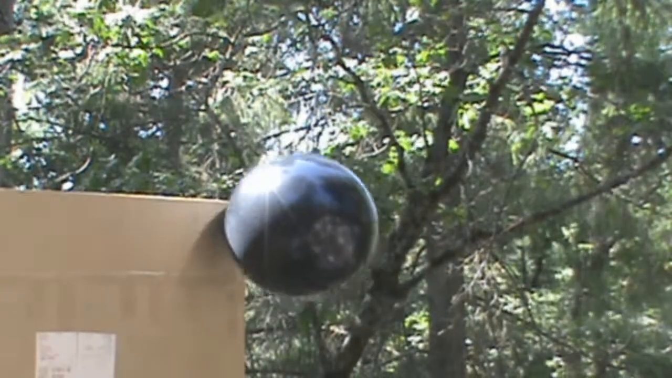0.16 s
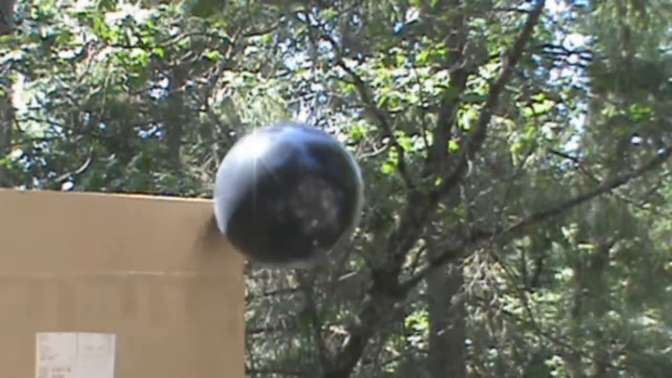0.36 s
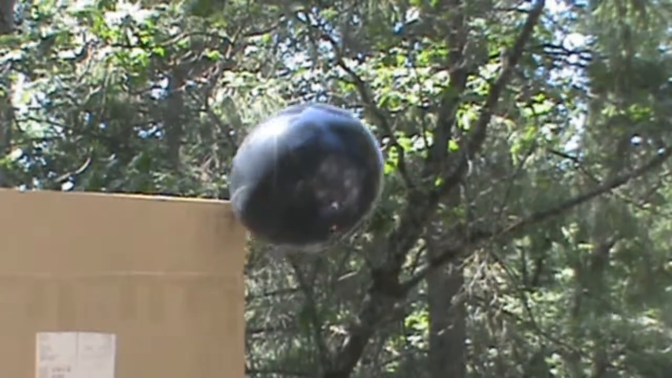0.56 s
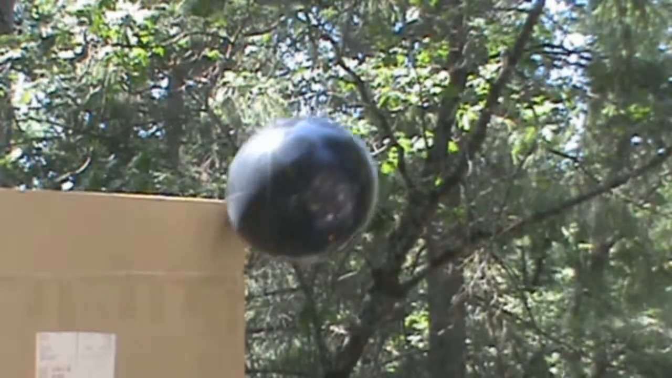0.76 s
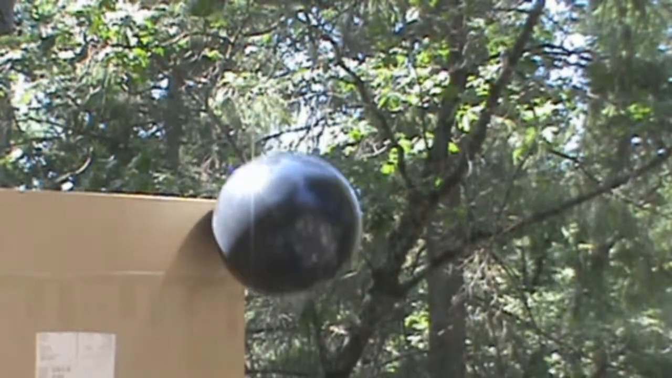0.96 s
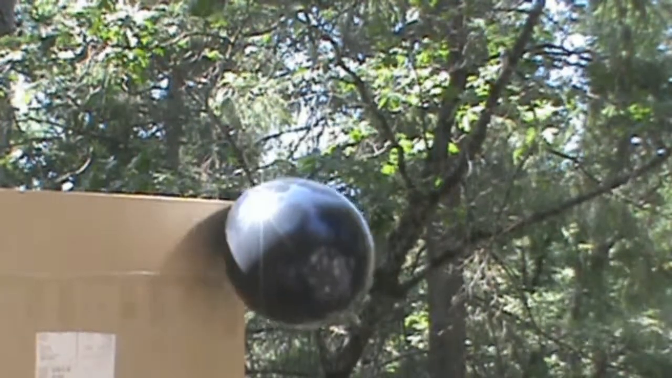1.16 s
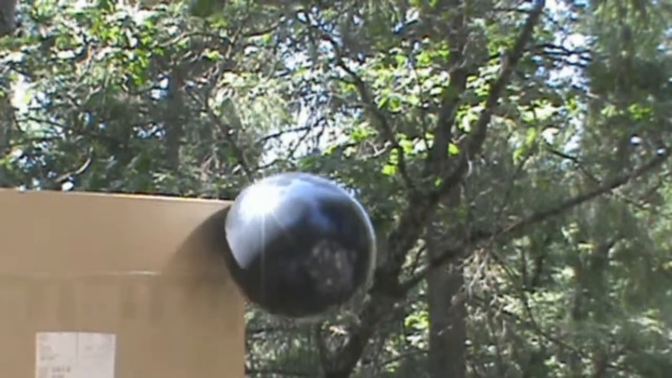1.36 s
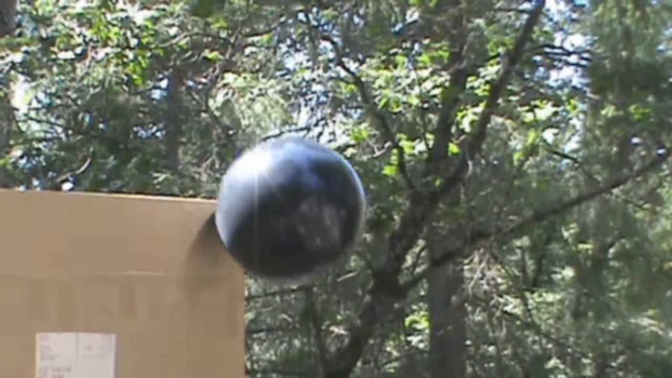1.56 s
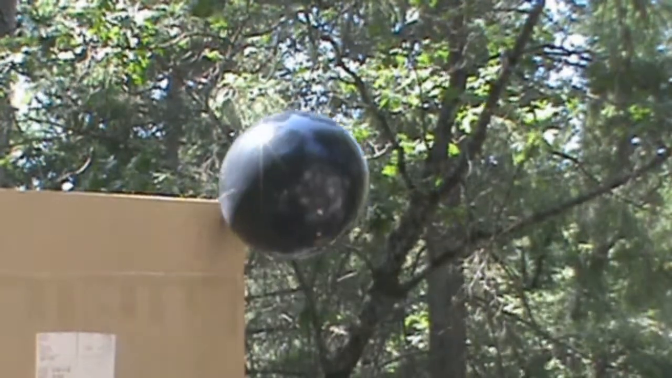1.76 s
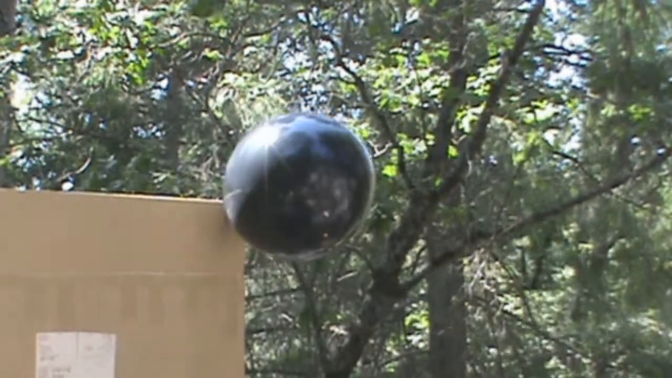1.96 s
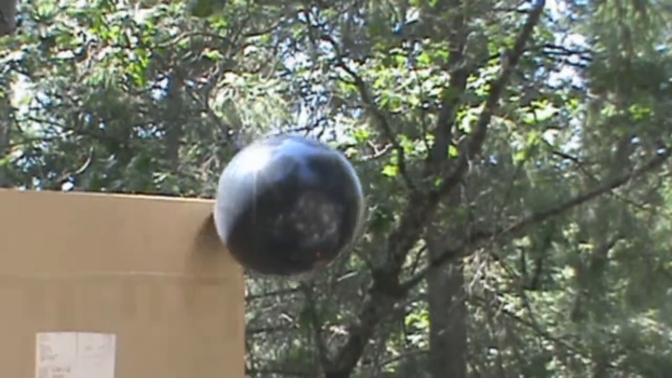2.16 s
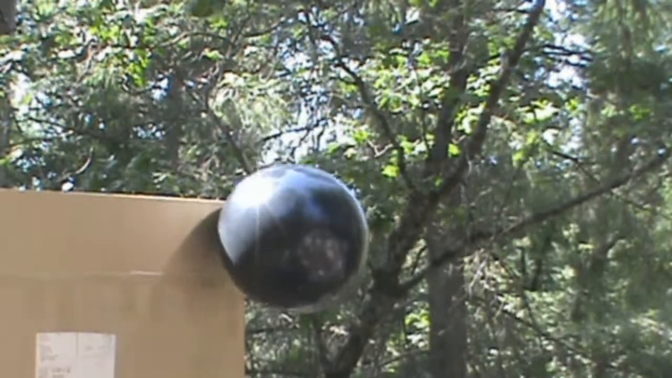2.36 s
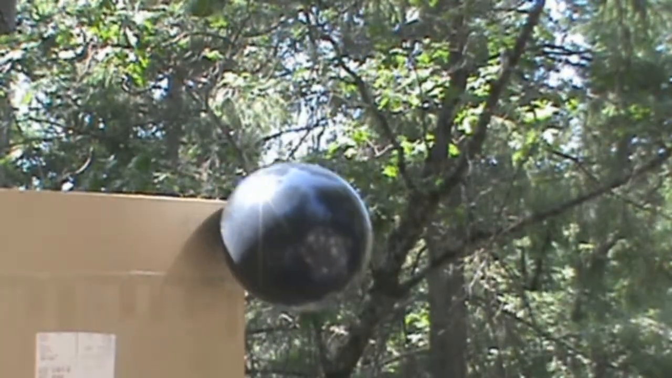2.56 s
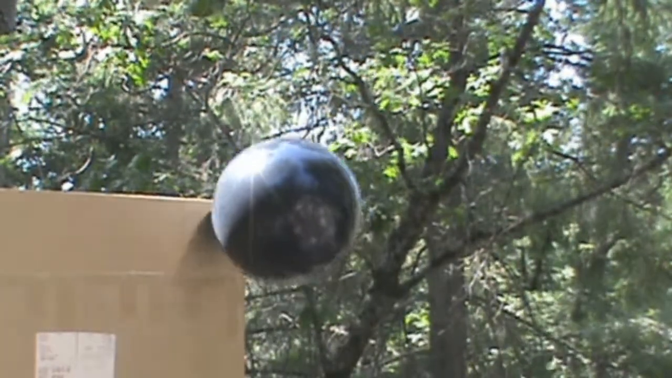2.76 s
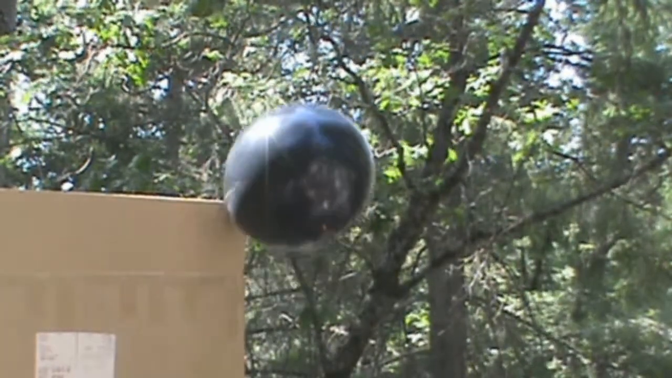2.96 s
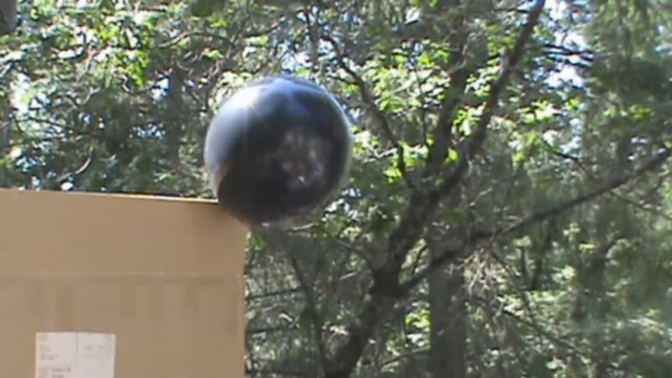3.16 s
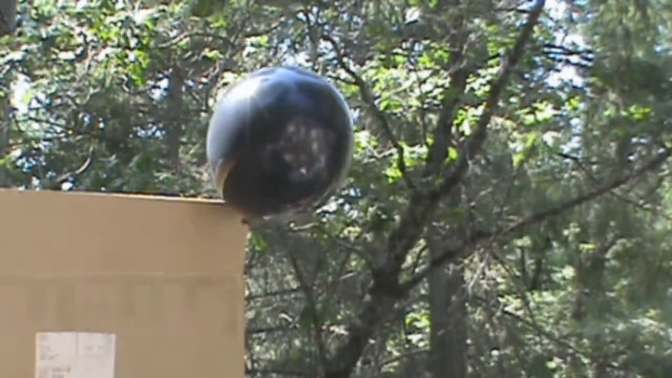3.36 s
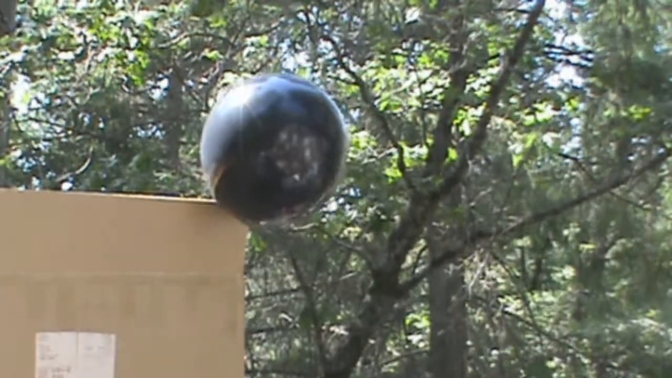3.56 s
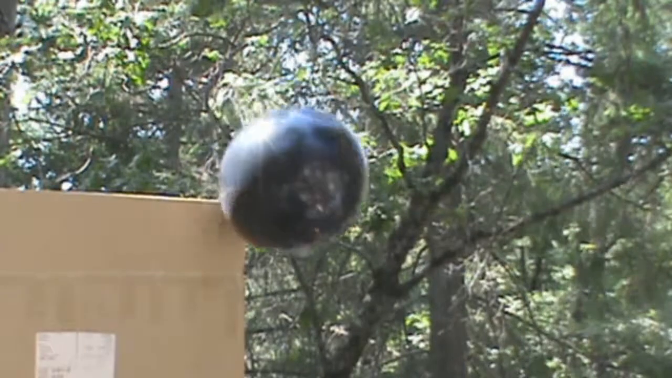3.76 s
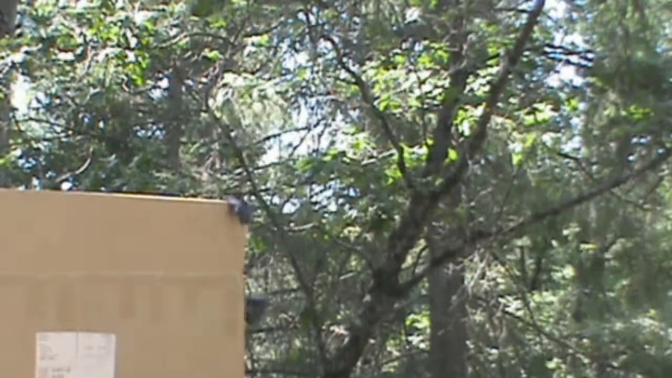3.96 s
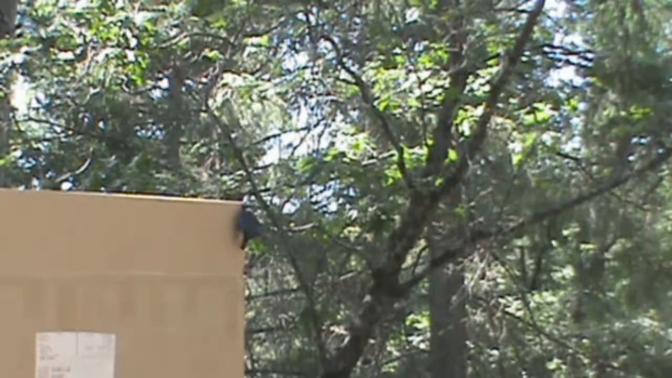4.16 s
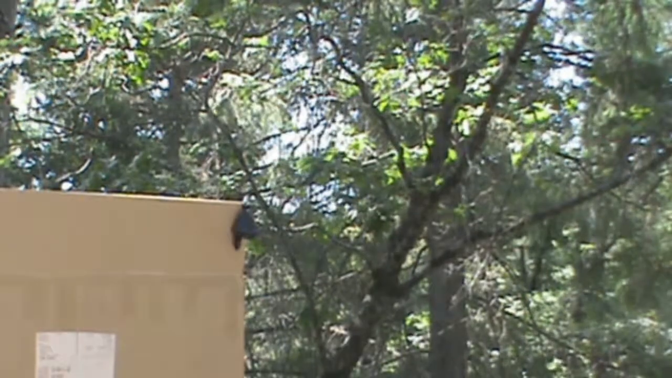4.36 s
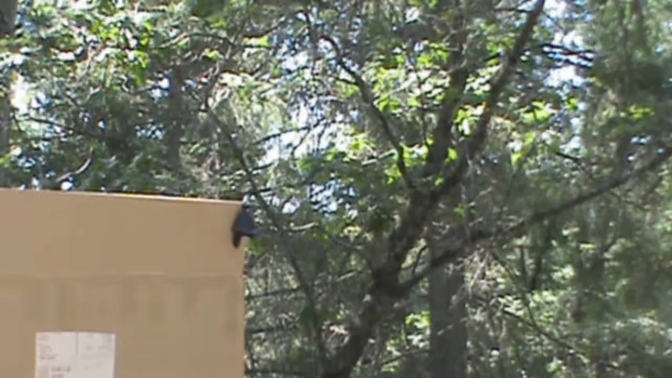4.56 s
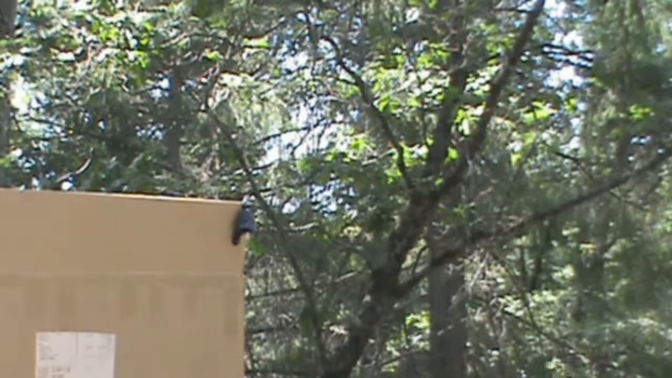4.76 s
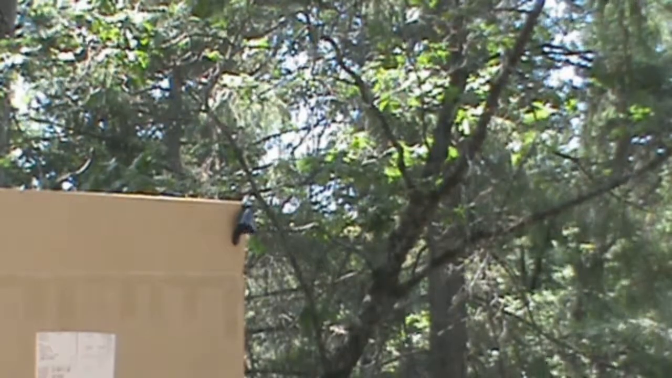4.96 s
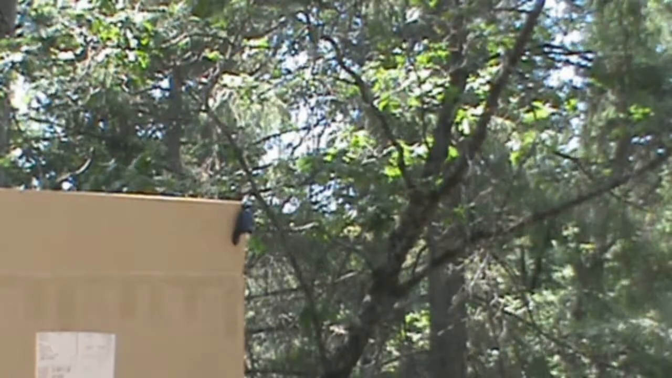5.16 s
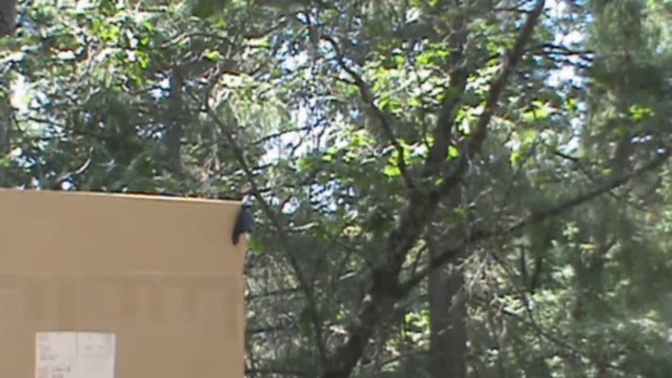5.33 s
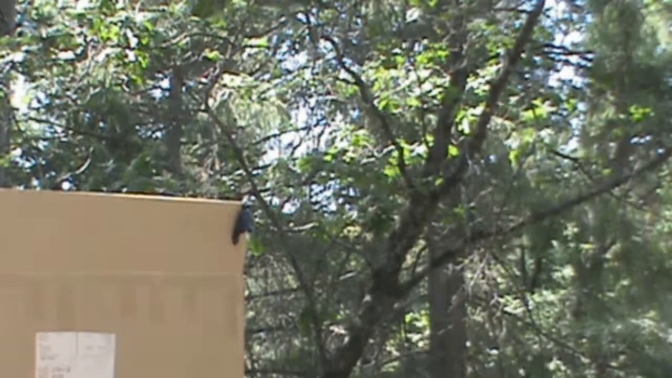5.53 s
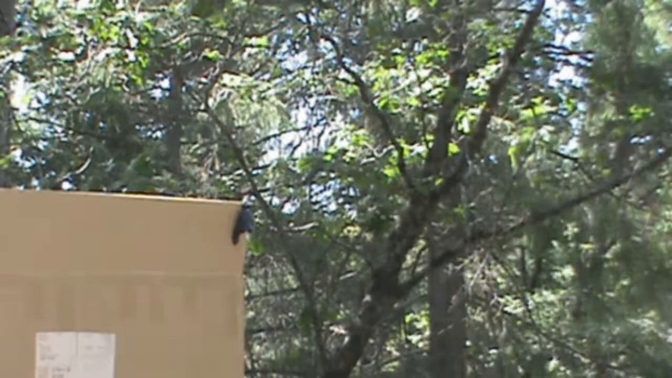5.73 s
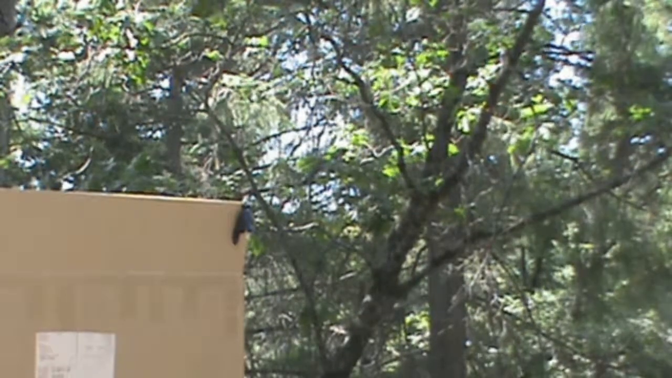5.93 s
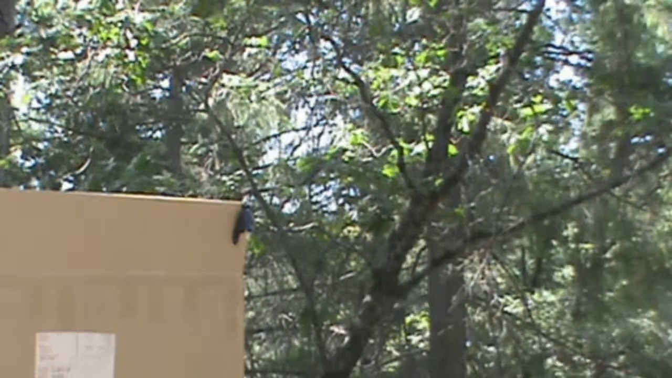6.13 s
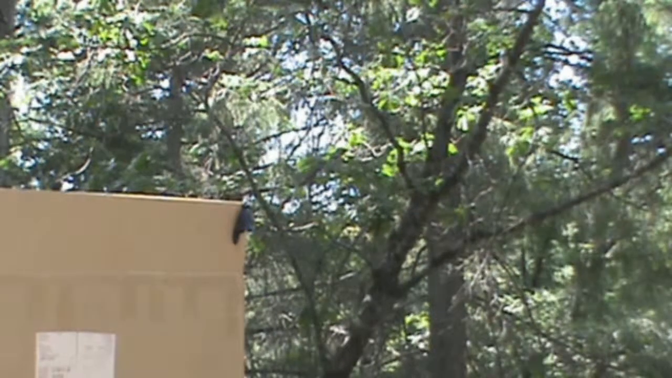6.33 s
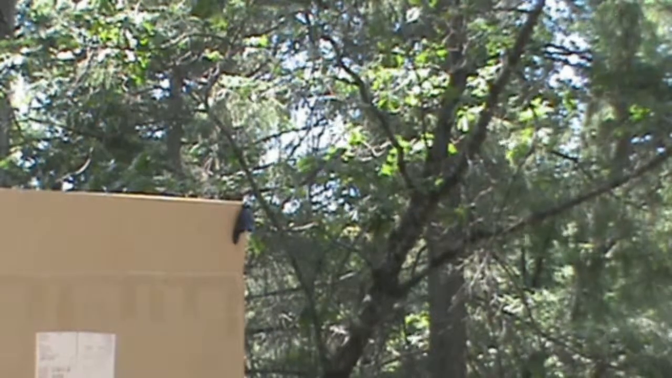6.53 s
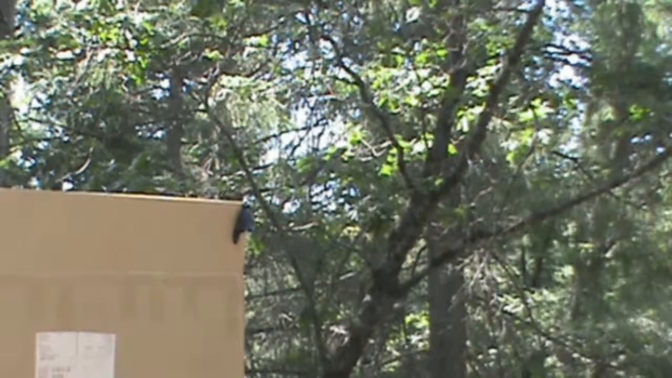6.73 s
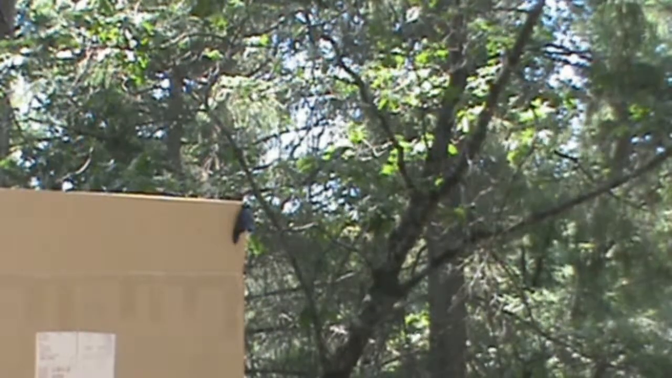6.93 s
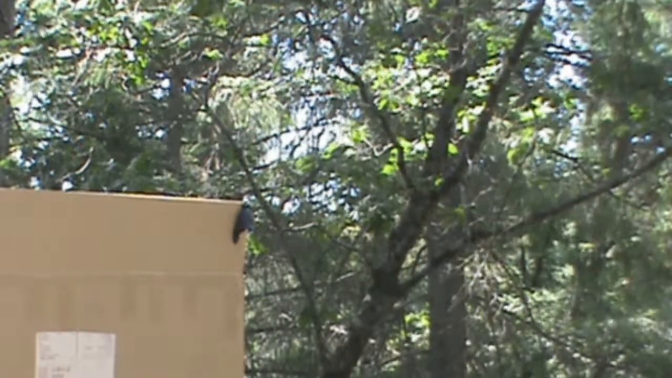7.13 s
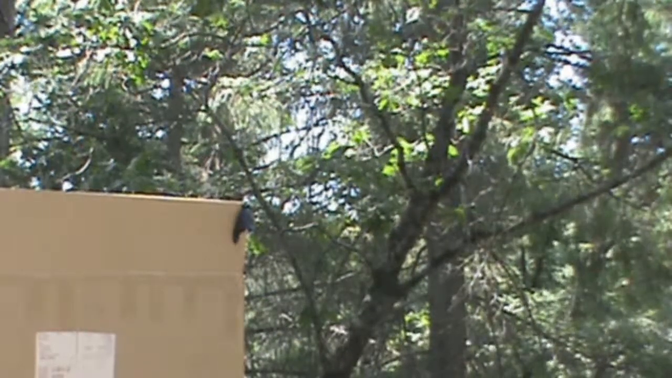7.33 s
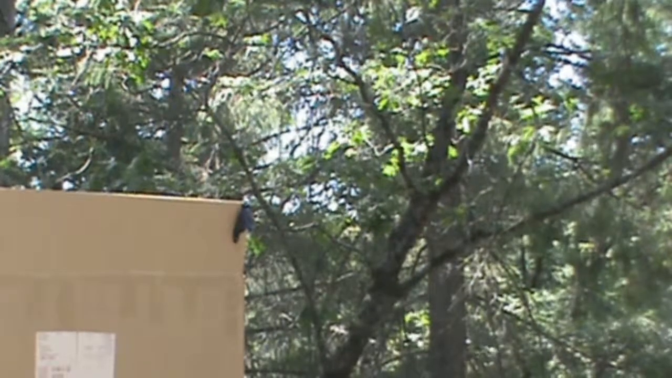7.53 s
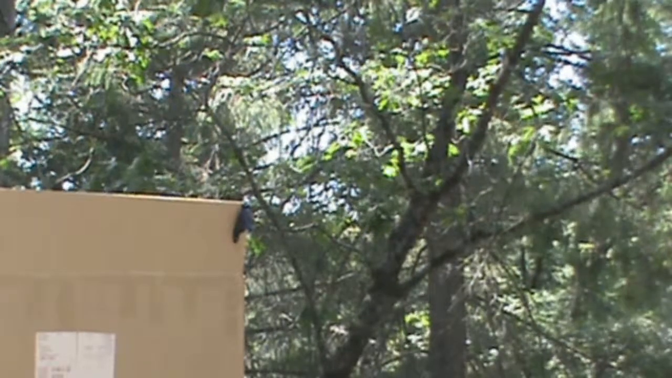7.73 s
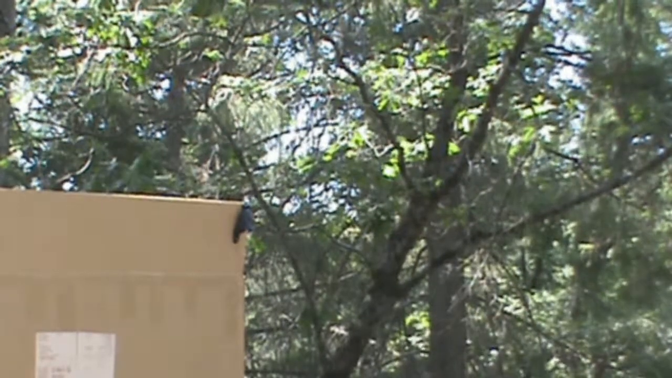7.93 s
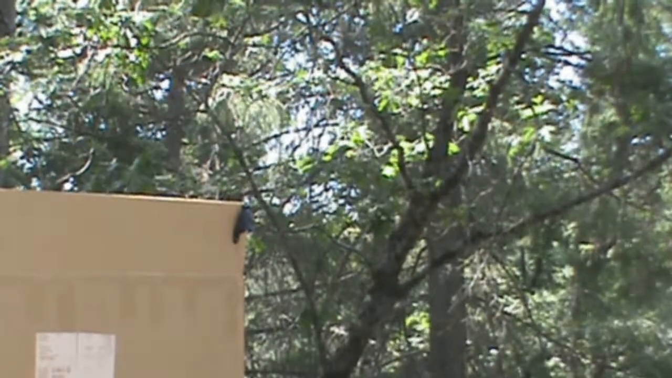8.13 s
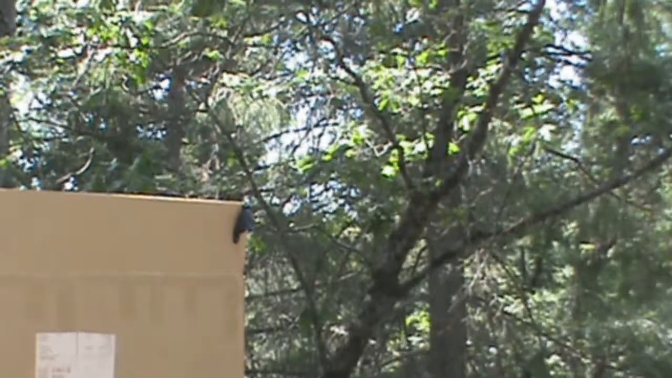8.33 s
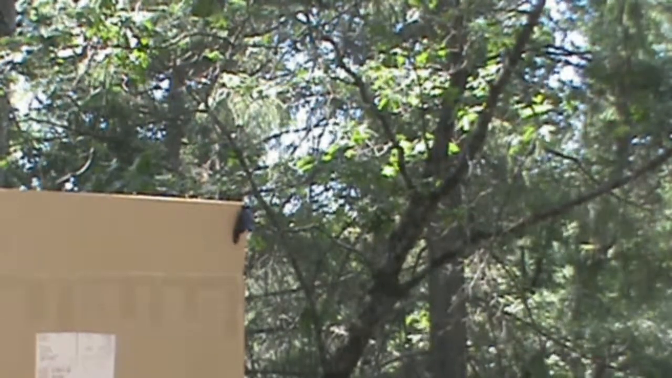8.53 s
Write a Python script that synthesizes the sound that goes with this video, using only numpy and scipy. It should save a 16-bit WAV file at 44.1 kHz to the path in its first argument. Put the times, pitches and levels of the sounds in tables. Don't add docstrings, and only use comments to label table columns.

```python
import sys
import numpy as np
from scipy import signal
from scipy.fft import rfft, irfft, next_fast_len
from scipy.io import wavfile
from scipy.ndimage import uniform_filter1d, map_coordinates

SR = 44100
rng = np.random.default_rng(int(sys.argv[2]) if len(sys.argv) > 2 else 0)


def unload_audio(sound):
    columns = np.transpose(np.atleast_2d(sound))
    steps = np.round(np.clip(columns, -1, 1) * 32767)
    wavfile.write(sys.argv[1], SR, steps.astype(np.int16))


def decibels_to_gain(level_db):
    exponent = np.asarray(level_db, float) / 20
    return 10 ** exponent


N = 378995
T = np.arange(N) / SR


def rms1(x):
    return x / np.sqrt(np.mean(x ** 2))


def colour(x, table):
    hz, db = np.transpose(table)[:2]
    size = next_fast_len(x.shape[-1])
    f = np.log(np.arange(size // 2 + 1) * SR / size + 1)
    gain = decibels_to_gain(np.interp(f, np.log(hz), db))
    return irfft(rfft(x, size) * gain, size)[..., :x.shape[-1]]


def band(x, lo_hz, hi_hz, order=3):
    sos = signal.butter(order, [lo_hz, min(hi_hz, 20000)], "band", fs=SR, output="sos")
    return signal.sosfilt(sos, x)


def high(x, hz):
    return signal.sosfilt(signal.butter(2, hz, "high", fs=SR, output="sos"), x)


def hiss(count, like=.8):
    mid, side = rng.standard_normal((2, count))
    like = np.clip(like, 0, .99)
    return np.sqrt((1 + like) / 2) * mid + np.sqrt((1 - like) / 2) * side * np.array([[1], [-1]])


def flicker(count, rate, depth_db):
    k = int(SR / rate)
    held = np.repeat(rng.standard_normal(count // k + 1), k)
    return decibels_to_gain(depth_db * uniform_filter1d(held, k)[:count])


def fall(t, t60):
    return np.exp(-np.log(1000) * t / t60)


def ring(hz, t60):
    t = T[:int(min(t60, .6) * SR) + 8]
    return np.sin(2 * np.pi * hz * t) * fall(t, t60)


def swell(start, rise, hold, t60):
    rise, t60 = max(rise, .001), max(t60, .005)
    t = T[:min(int((rise + hold + t60) * SR), N - int(start * SR))]
    opening = np.sin(np.pi / 2 * np.clip(t / rise, 0, 1)) ** 2
    return t, opening * decibels_to_gain(-60 * np.clip(t - rise - hold, 0, None) / t60)


def add(out, s, x, pan_db=-4.0):
    i = int(s * SR)
    out[:, i:i + x.shape[-1]] += x * decibels_to_gain(np.array([[pan_db], [-pan_db]]) / 2)


def background():
    # frequency in Hz, level in dB per Hz.
    traffic = [(12, -37), (28, -2), (43, 0.5), (74, -10.5), (107, -0.5), (146, -7), (248, -4.5), (328, -4),
               (459, -1), (698, -2.5), (1330, -11), (2910, -22.5), (3160, -22), (8650, -24.5), (16000, -25)]
    # frequency in Hz, likeness of left and right 0-1.
    alike = [(60, 1), (130, 0.97), (290, 0.95), (640, 0.87), (1410, 0.35), (3100, 0.43), (6820, 0.34),
             (15000, 0.77)]
    # time in seconds, level in dB.
    breeze = [(0, 3.5), (.6, 9.5), (.9, 0.5), (2, 1), (3.3, -0.5), (3.9, 2.5), (4.6, -0.5), (5.3, 1),
              (6, 1), (7.1, 0), (7.5, 3.5), (8.59, 3)]
    level_db, recover_db, recover_tau_s, shot_end_s = -55.5, -5, 0.61, 4.22
    hz, like = np.transpose(alike)
    like = np.clip(like, 0, .99)
    mid, side = colour(rng.standard_normal((2, N)), traffic)
    mid = colour(mid, np.c_[hz, 10 * np.log10(1 + like)])
    side = colour(side, np.c_[hz, 10 * np.log10(1 - like)])
    x = np.array([mid + side, mid - side]) / np.std(band(mid, 508, 980))
    x = x + (decibels_to_gain(np.interp(T, *np.transpose(breeze))) - 1) * band(x, 2197, 17000, order=1)
    dip_db = recover_db * (T > shot_end_s) * np.exp(-np.abs(T - shot_end_s) / recover_tau_s)
    return x * decibels_to_gain(level_db + dip_db) * flicker(N, rate=3.152, depth_db=0.7)


def whine(out):
    add(out, 0, decibels_to_gain(-77.0) * rms1(band(hiss(N, like=0.428), 3080, 3160, order=1)), pan_db=-9.0)
    add(out, 0, decibels_to_gain(-73.5) * rms1(band(hiss(N, like=1.0), 15500, 15700, order=1)), pan_db=-2.5)


def clicks(out):
    # start in seconds, peak in dB, ring in Hz, left minus right in dB.
    latch = [
        (0.096, -24, 3500, -9),
        (0.0971, -29, 2530, -3),
        (.101, -19.5, 3340, -8),
        (0.1064, -22, 3450, -4),
        (.118, -33, 4200, -3),
    ]
    bodies = [
        (0.2222, -28.5, 2590, -9),
        (5.499, -35.5, 1880, -2.5),
        (1.5087, -38, 1100, -5),
    ]
    fittings = [(0.223, -40, 6100, -7), (0.279, -33, 5000, -5), (.228, -30, 2800, -5),
                (.242, -33, 5200, -4), (0.789, -27, 4900, -9), (0.8, -31, 5140, 1), (1.294, -39, 7100, -11),
                (1.3004, -42, 7460, -2), (1.654, -24.5, 2720, -3), (3.7, -45, 1710, -1.1),
                (5.4844, -34, 6750, 3), (6.8678, -36, 5500, -7), (6.8716, -30, 5000, -5)]
    ticks = [
        (0.2518, -28, 13600, 0),
        (.252, -30, 14800, 0),
        (0.4174, -49, 9890, -0.6),
        (1.8703, -44, 8100, -7),
        (3.754, -43.5, 9970, 1.1),
        (7.4794, -46, 8140, -0.6),
    ]
    snaps = [
        (6.6814, -23, 5500, -11),
        (4.216, -10.5, 10000, -2),
        (3.941, -16, 4460, -1),
        (3.946, -7, 5500, -1),
        (3.9459, -16.5, 1500, -1),
        (4.0245, -11, 3200, 0.1),
        (4.0426, -10.5, 3220, 0),
        (4.082, -13, 5100, 1.5),
    ]
    faint = [(7.231, -48, 2920, -5), (7.2705, -37, 2800, -6), (7.6612, -35.5, 2240, -4.5),
             (7.7458, -40, 3600, -7), (7.8892, -43, 3500, -2.5), (8.0196, -33.5, 7800, -7),
             (8.0196, -34.5, 3900, -7), (8.219, -41, 3700, -5), (8.3639, -40, 6550, -5),
             (8.29, -48, 6000, -4), (1.65, -31, 3000, -3), (1.667, -30, 2400, -3), (1.74, -33, 3000, -3),
             (1.72, -30.5, 2200, -3), (1.805, -47, 5000, -5), (1.5682, -41, 3600, -3),
             (1.5078, -27.5, 2160, -5), (1.5078, -34, 5000, -3)]
    catch = [(6.871, -32, 3510, -6), (6.8712, -37, 4760, -4), (6.8712, -37, 6000, -7),
             (6.8712, -33, 7025, -4), (6.8712, -37, 9300, -4), (6.8965, -48, 3420, -4),
             (6.8965, -42, 8330, -4), (0.098, -35, 7150, -7), (.0975, -43, 8400, -7),
             (.0975, -44, 11500, -7), (.0975, -44, 4940, -7), (.1063, -34, 3445, -5)]
    # t60 in seconds, burst spread as pitch ratio, mode share 0-1.
    rings = [(0.01, 1.26, 0.78), (0.0065, 1.85, .6), (0.0093, 2.2, 0.74), (.01, 1.3, 0.74),
             (.003, 3.4, 0.72), (0.012, 2.2, 0.47), (0.046, 1.09, 0.66)]
    families = (latch, bodies, fittings, ticks, snaps, faint, catch)
    for rows, (t60, spread, mode) in zip(families, rings):
        spread = max(spread, 1.05)
        for s, db, hz, pan_db in rows:
            x = ring(hz, t60)
            lo, hi = hz / spread ** 1.03, min(hz * spread, 15500)
            burst = rms1(band(rng.standard_normal(500 + SR // 8), lo, hi, order=2))[500:500 + len(x)]
            burst = burst * fall(T[:len(x)], t60)
            snap = band(signal.unit_impulse(len(x)), lo, hi, order=2)
            click = mode * x + 0.44 * burst + .5 * snap / snap.max()
            add(out, s, decibels_to_gain(db) * click, np.clip(pan_db, -7, 2))


def rubs(out):
    # peak in seconds, rise in seconds, fall t60 in seconds, level in dB, centre in Hz.
    strokes = [(.104, 0.0063, 0.11, -47, 2700), (.797, 0.0072, 0.097, -47.5, 4700),
               (1.575, .008, .6, -46.5, 2700), (6.878, 0.0045, .1, -60, 3300),
               (.218, 0.029, .03, -54, 4960), (.228, .008, 0.15, -42.5, 2800),
               (.248, .025, 0.19, -43, 4300), (.33, .04, 0.32, -57, 4500), (1.028, .07, .5, -56, 3100),
               (1.106, 0.019, 0.25, -52, 2850), (1.652, .07, 0.43, -39.5, 2600),
               (1.7, .03, 0.2, -40.5, 3180), (1.68, .05, 0.4, -52, 7400), (1.745, .05, 0.088, -42, 2610),
               (3.702, 0.056, 0.51, -57, 1615), (5.5, .018, 0.24, -48.5, 3930),
               (6.873, 0.003, 0.1, -40, 4800), (6.875, 0.0043, .12, -56, 9000),
               (7.238, 0.027, 0.6, -55.5, 2800), (8.224, 0.019, 1, -55, 3200), (8.37, 0.11, .2, -64, 3500)]
    for s, rise, t60, db, hz in strokes:
        gate = swell(s - rise, rise, 0, t60)[1]
        tilt_db = 8 * np.log2(hz / 3000)
        low_db, top_db = -7 - tilt_db, -8.5 + tilt_db
        grit = hiss(len(gate), like=0.71)
        grit = grit * flicker(len(gate), rate=1500, depth_db=1.5) * flicker(len(gate), rate=150, depth_db=2.5)
        mix = rms1(band(grit, hz / 2.0, hz * 1.81, order=2))
        mix = mix + decibels_to_gain(low_db) * rms1(band(grit, 300, 830, order=2))
        mix = mix + decibels_to_gain(top_db) * rms1(band(grit, 4270, 9870, order=2))
        add(out, s - rise, mix * decibels_to_gain(db) * gate)


def thud(out, s, db, hz, t60):
    add(out, s, decibels_to_gain(db) * (0.94 * ring(hz, t60) + 0.18 * ring(1.4 * hz, t60)), pan_db=-1.5)


def knocks(out):
    # start in seconds, peak in dB, ring in Hz, t60 in seconds.
    hits = [
        (1.667, -33, 486, 0.033),
        (1.705, -33.5, 564, 0.032),
        (0.295, -33.5, 366, 0.03),
        (1.622, -31, 441, 0.079),
        (3.699, -36.5, 963, 0.043),
        (7.269, -41.5, 796, 0.043),
        (7.8726, -28.5, 450, 0.028),
        (7.873, -40, 160, .12),
        (7.884, -38, 228, 0.061),
    ]
    for s, db, hz, t60 in hits:
        thud(out, s, db, hz, t60)


def jets(out):
    # valve opens in seconds, rise in seconds, hold in seconds, top hiss in dB, fall t60 in seconds.
    openings = [
        (0.471, 0.044, .05, -21.5, 0.057),
        (0.546, 0.038, 0.048, -19.5, 0.16),
        (3.911, 0.011, 0.03, -22.5, .04),
        (3.94, .022, 0.254, -17, .03),
        (6.682, 0.006, 0.023, -21.5, 0.12),
    ]
    # middle hiss minus top in dB, barrel roar minus top in dB, pressure drift in dB/s.
    balance = [(-5, -20.5, 12), (-5.5, -18.5, -62), (-2, -17.5, -2), (-6, -22.5, -2), (-5, -13, 48)]
    # frequency in Hz, level in dB per Hz.
    fill_air = [(290, -44), (500, 4), (729, -15), (893, -15), (1130, -19), (1360, -16), (3920, -10),
                (4470, -8.5), (9770, 1.5), (14500, -3), (16000, 0)]
    shot_air = [(290, -55), (500, -7.5), (1090, -27.5), (1180, -24.5), (1690, -17.5), (2010, -21),
                (2890, -18.5), (6140, -9.5), (7300, -7), (8100, 0), (11200, -1), (12000, -1.5), (13400, -9),
                (14900, -11.5), (16000, -14)]
    vent_air = [(290, -40), (500, 9), (595, -2), (831, -11), (1180, -12.5), (1640, -15), (2500, -13),
                (2930, -11.5), (8700, -5), (9920, -0.5), (16000, -11.5)]
    # centre in Hz, width in Hz, level in dB.
    nozzle = [(940, 99, -17), (1510, 1100, -13.5), (3920, 630, -11), (5820, 1300, -6.5), (7770, 800, -9),
              (8440, 1000, -3), (11000, 1200, -13), (12600, 400, -8), (14500, 1100, -10)]
    # start in seconds, level in dB, start in Hz, end in Hz, length in seconds.
    sputter = [
        (3.913, -24, 2980, 6450, 0.0067),
        (3.919, -22, 3000, 6500, 0.0078),
        (3.92, -15, 6100, 10400, 0.003),
        (3.925, -13.5, 5900, 11000, .004),
        (3.932, -21, 6160, 11000, 0.0039),
    ]
    duck_s, duck_db, duck_width_s = 4.036, -4, 0.011
    airs = (None, fill_air, shot_air, shot_air, vent_air)
    for (s, rise, hold, db, t60), (mid_db, low_db, drift_db), air in zip(openings, balance, airs):
        t, gain = swell(s, rise, hold, t60)
        duck = duck_db * np.exp(-((s + t - duck_s) / duck_width_s) ** 2)
        gain = gain * decibels_to_gain(db + drift_db * np.clip(t - rise, 0, hold) + duck)
        x = hiss(len(t), like=0.61)
        if air is None:
            cavities = sum(decibels_to_gain(g) * rms1(band(x, f - w / 2, f + w / 2, order=2)) for f, w, g in nozzle)
            x = decibels_to_gain(7) * rms1(colour(x, fill_air)) + cavities
        else:
            x = colour(x, air)
        mix = rms1(band(x, 6370, 16500))
        mix = mix + decibels_to_gain(mid_db) * rms1(band(x, 2640, 7080))
        mix = mix + decibels_to_gain(low_db) * rms1(band(x, 884, 2840))
        mix[0] += 0.45 * band(mix[0], 11000, 17000, order=1)
        rough = flicker(len(t), rate=210, depth_db=0.84) * flicker(len(t), rate=45, depth_db=0.5)
        add(out, s, mix * gain * rough)
    for s, db, f0, f1, length in sputter:
        t = T[:int(length * SR)]
        add(out, s, decibels_to_gain(db) * np.hanning(len(t)) * signal.chirp(t, f0, length, f1))


def buffet(out):
    # peak in seconds, rise in seconds, fall t60 in seconds, level in dB.
    gusts = [
        (.585, 0.027, 0.47, -48),
        (.652, 0.066, .07, -45),
        (1.1, 0.054, .08, -59),
        (1.64, 0.048, 0.45, -50),
        (1.738, 0.087, 0.13, -47),
        (4.032, .01, 0.18, -26),
        (4.216, .025, 0.35, -45),
        (6.692, 0.0038, 0.28, -31.5),
        (7.874, 0.0031, 0.12, -45),
    ]
    for s, rise, t60, db in gusts:
        gate = swell(s - rise, rise, 0, t60)[1]
        rumble = rms1(band(hiss(len(gate), like=0.99), 90, 390, order=2))
        add(out, s - rise, rumble * decibels_to_gain(db) * gate, pan_db=1.0)


def balloon(out):
    # start in seconds, peak in dB, shock length in seconds.
    pops = [
        (4.023, -10, 0.001),
        (4.027, -21, 0.00093),
        (4.0287, -18.5, 0.0005),
        (4.032, -17, 0.0005),
        (4.041, -12.5, 0.00064),
        (4.045, -12, 0.0003),
        (4.048, -26, 0.0005),
    ]
    # frequency in Hz, level in dB, t60 in seconds.
    box = [(256.6, 5.5, 0.21), (921, -24, 0.15), (1196, 0, 5.0), (1270, -16.5, 0.43), (1486, -1, 0.44),
           (1554, 7.5, 0.057), (1730, -5, 0.32), (1847, -15.5, 0.29), (2134, 0.5, 0.22), (2530, -19, 5.0),
           (2526, -8.5, 0.15), (3040, -7, 0.37)]
    drum = np.zeros(SR // 2)
    for hz, db, t60 in box:
        x = ring(hz, min(t60, .07))
        drum[:len(x)] += decibels_to_gain(db) * x
    for s, db, length in pops:
        dip = np.bartlett(int(length * SR))
        add(out, s, decibels_to_gain(db) * np.r_[-dip, .45 * np.repeat(dip, 2)], pan_db=-4)
        add(out, s, decibels_to_gain(db - 19.5) * drum, pan_db=-6.5)
    rip_s = 4.0235
    gate = swell(rip_s, rise=.004, hold=.02, t60=0.15)[1]
    rip = hiss(len(gate), like=.5) * flicker(len(gate), rate=700, depth_db=3.5)
    rip = rms1(band(rip, 980, 1800, order=1)) + decibels_to_gain(-5.0) * rms1(band(rip, 2000, 5200, order=1))
    add(out, rip_s, rip * decibels_to_gain(-22) * gate, pan_db=-6.0)
    gate = swell(rip_s, rise=0.006, hold=0, t60=.22)[1]
    rush = rms1(band(hiss(len(gate), like=1.0), 950, 1900, order=1))
    add(out, rip_s, rush * decibels_to_gain(-19.5) * gate)


def birds(out):
    # start in seconds, length in seconds, level in dB, pitch in Hz.
    chirps = [
        (5.2, .2, -68, 12800),
        (5.26, .12, -67, 11500),
        (7.122, 0.1, -60.5, 7060),
        (7.14, .06, -63, 8050),
        (7.315, .025, -62, 8050),
        (7.369, .05, -59, 8080),
        (7.528, .035, -60, 8200),
        (7.658, .04, -61, 7970),
        (8.066, .055, -57, 7430),
    ]
    sag_hz_per_s = 1470
    for s, length, db, hz in chirps:
        t, gate = swell(s, 0.0089, .6 * length, .05)
        rough = rms1(band(hiss(len(gate), like=0.42), 30, 420, order=1))
        tone = np.sin(2 * np.pi * (hz - sag_hz_per_s * t / 2) * t)
        add(out, s, 1.3 * decibels_to_gain(db) * gate * rough * tone, pan_db=-3.0)


def hose(out):
    thump = (6.6812, -15.5, 0.00054)
    # start in seconds, peak in dB, ring in Hz, t60 in seconds.
    modes = [
        (6.684, -18.5, 250, 0.043),
        (6.688, -28.5, 596, 0.12),
        (6.69, -26, 151, 0.19),
        (6.69, -34, 85, .15),
    ]
    s, db, length = thump
    drop = np.linspace(1, -.2, int(length * SR))
    pulse = np.r_[np.linspace(0, 1, 9), drop, -.2 * np.exp(-T[:200] / .0012)]
    add(out, s, decibels_to_gain(db) * pulse, pan_db=-13.0)
    for s, db, hz, t60 in modes:
        thud(out, s, db, hz, t60)


def insect(out):
    start_s = 7.22
    gate = swell(start_s, rise=0.2, hold=0.97, t60=.2)[1]
    trill = hiss(len(gate), like=0.81)
    trill = rms1(band(trill, 3990, 4220, order=2)) + decibels_to_gain(-4.0) * rms1(band(trill, 4440, 5140, order=2))
    add(out, start_s, trill * decibels_to_gain(-66.5) * gate * flicker(len(gate), rate=29, depth_db=3.0), pan_db=-5.5)


def echoes(x):
    # centre in Hz, level in dB, t60 in seconds.
    wood = [(120, -35, 1.1), (250, -21, 0.747), (498, -12.5, 0.97), (890, -17.5, 1.1), (1495, -12, 0.98),
            (2400, -16, 1.02), (3730, -13.5, 0.54), (5660, -15.5, 0.34), (8540, -19, 0.3),
            (11500, -24, .27), (14500, -21.5, .22)]
    yard_db, yard_t60_s = -8.5, 0.078
    sway_s, sway_per_s = .0004, 25
    t = T[:SR]
    tail = rms1(hiss(SR, like=0.42)) * fall(t, yard_t60_s) * (t > .004)
    tail = tail * decibels_to_gain(yard_db) / np.sqrt(np.sum(tail ** 2) / 2)
    for hz, db, t60 in wood:
        part = band(hiss(SR, like=0.53), hz / 1.54, hz * 1.45, order=2)
        part = part * fall(t, t60) * np.clip(t / 0.021, 0, 1)
        tail = tail + decibels_to_gain(db) * part / np.sqrt(t60 * SR / 14)
    sway = sway_s * SR * np.log(flicker(N, rate=sway_per_s, depth_db=8.686))
    wet = signal.fftconvolve(x.mean(0)[None], tail, axes=1)[:, :N]
    return np.array([map_coordinates(y, [np.arange(N) + sway], mode="mirror") for y in wet])


def scene():
    near, far = np.zeros((2, 2, N))
    back = background()
    for source in (clicks, rubs, knocks, jets, buffet, balloon, hose):
        source(near)
    for source in (whine, birds, insect):
        source(far)
    near = high(near, 85)
    limit = 0.08
    squeeze = 1 + signal.lfilter([.0008], [1, -.9992], np.abs(near).mean(0)) / limit
    return near + far + (echoes(near * squeeze) + back) / squeeze


def roll_off(x):
    return signal.sosfilt(signal.butter(12, 16810, fs=SR, output="sos"), x)


def record(dry):
    x = np.tanh(1.1 * high(dry, 30)) / 1.1
    x = signal.sosfilt(signal.ellip(10, .3, 70, 15690, fs=SR, output="sos"), x)
    return roll_off(x)


dry = scene()
out = record(dry)
unload_audio(out)
```